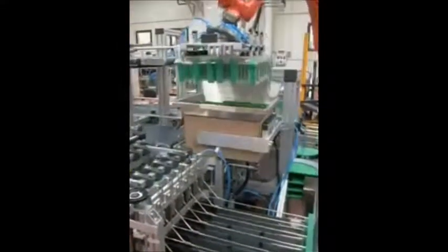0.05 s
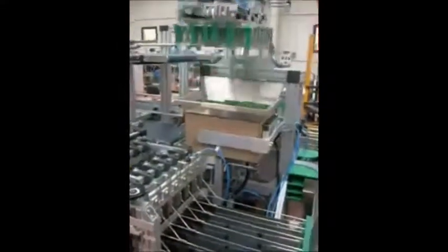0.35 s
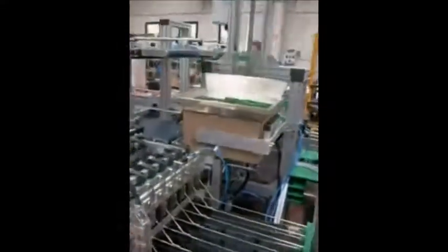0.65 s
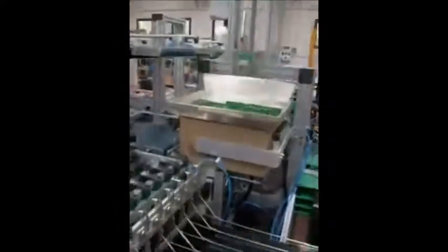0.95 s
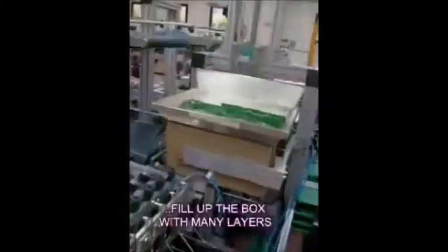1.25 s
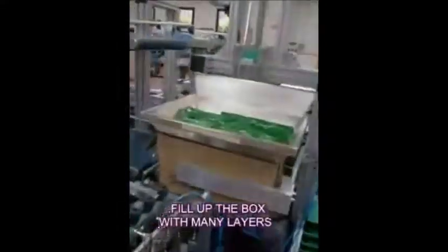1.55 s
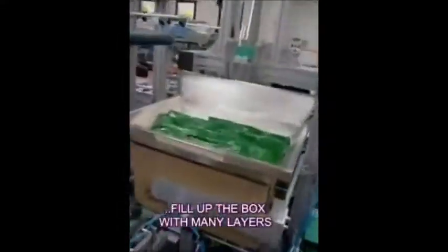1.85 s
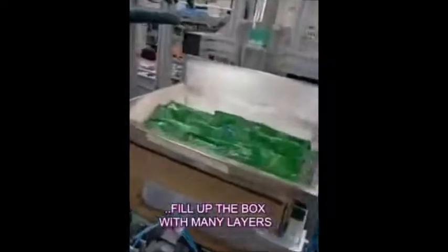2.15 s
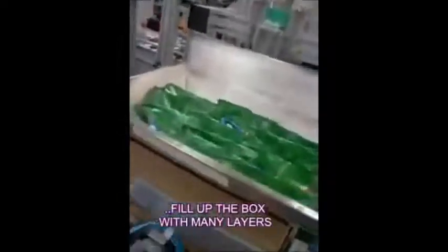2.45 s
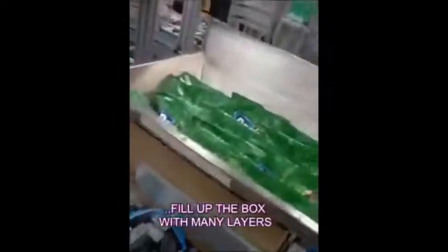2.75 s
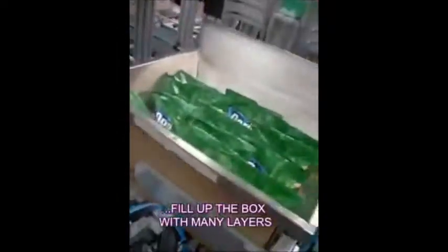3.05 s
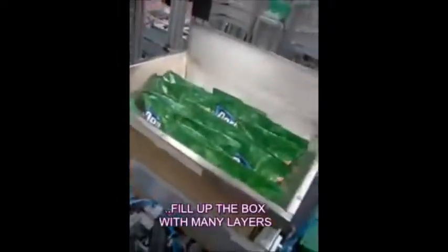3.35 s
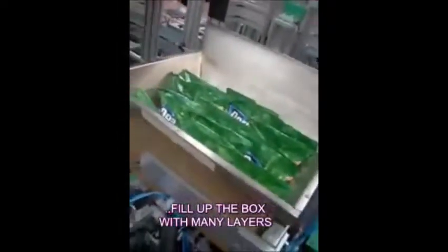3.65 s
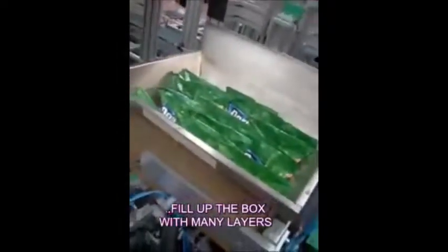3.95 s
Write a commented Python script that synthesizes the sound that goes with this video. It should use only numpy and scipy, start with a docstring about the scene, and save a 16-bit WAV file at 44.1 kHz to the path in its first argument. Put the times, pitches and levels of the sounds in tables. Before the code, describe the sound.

Compressed air hisses, swells to a loud hollow rush, then dies back over factory machinery.

```python
"""Factory hall: a packing robot lifts its air gripper off a box; valves and linkages click.
Compressed air spurts, settles to a steady hiss with high whistles, then swells to a loud,
hollow rush and dies back. The air rings between nearby panels, a flutter echo that sinks
as the gap widens. A motor whines thinly; machines rumble softly underneath."""
import sys
import numpy as np
from scipy import signal
from scipy.fft import rfft, irfft
from scipy.io import wavfile
from scipy.ndimage import uniform_filter1d, map_coordinates

SR = 44100
rng = np.random.default_rng(int(sys.argv[2]) if len(sys.argv) > 2 else 0)


def bounce(signal):
    """Save signal as a 16-bit WAV file at the path given by the first command-line argument."""
    frames = np.transpose(np.atleast_2d(signal))
    limited = np.clip(frames, -1, 1)
    pcm = np.round(limited * 32767).astype(np.int16)
    wavfile.write(sys.argv[1], SR, pcm)


N = 176400

# Round-trip rate between the panels: t/s, f/Hz
ECHO_RATE_HZ = [(2.25, 140.3), (2.45, 138.7), (2.55, 134.9), (2.65, 131.8), (2.75, 131.2), (3, 130.8),
                (3.06, 129.5), (3.15, 128.2), (3.24, 126.5), (3.4, 127)]


def amp(db):
    """dB to gain."""
    return 10 ** (np.asarray(db) / 20)


def unit(x):
    """Scale to rms 1."""
    return x / np.sqrt(np.mean(x ** 2) + 1e-20)


def spectrum_db(points, hz):
    """Interpolate a spectrum over log frequency."""
    f, db = np.transpose(points)
    return np.interp(np.log(hz + 1), np.log(f + 1), db)


def envelope(points):
    """Level curve to gain per sample."""
    return amp(np.interp(np.arange(N) / SR, *np.transpose(points)))


def add(mix, start_s, sound):
    """Mix in at start_s, trimmed at both ends of the mix."""
    start = round(start_s * SR)
    sound = sound[max(-start, 0):]
    part = mix[max(start, 0):][:len(sound)]
    part += sound[:len(part)]


def wander(low_hz, top_hz):
    """Band-limited random motion, rms 1."""
    hz = np.fft.rfftfreq(N, 1 / SR)
    white = rfft(rng.standard_normal(N))
    return unit(irfft(white * hz / (hz + low_hz) / (1 + (hz / top_hz) ** 4), N))


def turbulence(spectrum, eddy_db, ring_db, flutter_db, flutter_hz):
    """Coloured noise, rms 1: broad eddies, narrow lingering resonances, overall flutter."""
    hz = np.fft.rfftfreq(2048, 1 / SR)
    real, imag, eddies, rings = rng.standard_normal((4, len(hz), N // 512 + 5))
    eddies = unit(uniform_filter1d(uniform_filter1d(eddies, size=24, axis=0), size=5, axis=1))
    rings = unit(uniform_filter1d(uniform_filter1d(rings, size=2, axis=0), size=36, axis=1))
    gain = amp(spectrum_db(spectrum, hz)[:, None] + eddy_db * eddies + ring_db * rings)
    noise = signal.istft((real + 1j * imag) * gain, nperseg=2048, noverlap=1536)[1][:N]
    return unit(noise * amp(flutter_db * wander(5.6, flutter_hz)))


def tone(hz, width_hz, db, rise_s=0.047, fall_s=0.15):
    """Breathy tone along a pitch curve; amplitude and phase sway at random."""
    t = np.arange(len(hz)) / SR
    sway = (wander(0.4, width_hz / 2) + 1j * wander(0.87, width_hz / 2))[:len(t)]
    carrier = np.exp(2j * np.pi * np.cumsum(hz) / SR)
    wave = (sway / np.sqrt(abs(sway) + 1e-6) * carrier).real
    shape = np.minimum(t / rise_s, 1) * np.minimum(t[::-1] / fall_s, 1)
    return amp(db) * shape * unit(wave)


def steady_tones(rows):
    """Sum of breathy tones at constant pitch."""
    out = np.zeros(N)
    for start_s, length_s, hz, width_hz, db in rows:
        add(out, start_s, tone(np.full(int(length_s * SR), hz), width_hz, db))
    return out


def air_rush():
    """Loud turbulent flow: swells, dies back."""
    spectrum = [(120, -69), (200, -62), (449, -33), (517, -33.5), (639, -23.5), (723, -26.5), (803, -26.5),
                (1200, -24.5), (1270, -23), (1490, -17), (1710, -7), (2350, -13), (2800, -3.5), (3340, 2),
                (3920, -8), (4130, -14.5), (5190, -17.5), (5770, -22.5), (8650, -36), (11900, -49.5),
                (13400, -60)]  # f/Hz, relative level/dB
    swell = [(1.3, -80), (1.75, -46), (1.85, -32.5), (2.08, -26.5), (2.3, -19.5), (2.56, -13), (2.72, -14),
             (2.94, -13), (3.08, -13), (3.27, -13), (3.42, -22.5), (3.6, -38), (3.75, -36), (4, -53)]  # t/s, level/dB
    return envelope(swell) * turbulence(spectrum, eddy_db=0.1, ring_db=1.5, flutter_db=1, flutter_hz=35)


def air_hiss():
    """Steady escape of compressed air."""
    spectrum = [(150, -68), (250, -42.5), (337, -39.5), (400, -31.5), (495, -24), (803, -20), (981, -20),
                (1220, -12.5), (1590, -15), (2410, -10), (2670, -9), (3200, 1.5), (3450, -2.5), (3950, -11),
                (5740, -28.5), (6450, -36), (10300, -47.5), (12200, -57), (13400, -73)]  # f/Hz, relative level/dB
    flow = [(.45, -56.5), (.65, -36.5), (.82, -38), (.96, -28), (1.1, -28), (1.22, -25), (1.6, -25),
            (2, -25), (3.3, -19.5), (3.58, -21), (3.75, -24), (4, -24.5)]  # t/s, level/dB
    return envelope(flow) * turbulence(spectrum, eddy_db=0.83, ring_db=2, flutter_db=0.13, flutter_hz=40)


def air_spurt():
    """First burst of compressed air."""
    spectrum = [(240, -87), (400, -46), (470, -37), (529, -30.5), (764, -36), (1200, -30), (1870, -32),
                (2050, -14.5), (2630, -15.5), (3270, 2), (3520, -5.5), (6160, -42.5), (11300, -56),
                (13400, -75)]  # f/Hz, relative level/dB
    burst = [(0, -46.5), (.2, -53.5), (.28, -45.5), (.36, -76), (.46, -60), (.5, -45), (.53, -44.5),
             (.57, -37), (.69, -29.5), (.78, -24.5), (.792, -21.5), (.83, -22.5), (.89, -24.5), (1.05, -29),
             (1.5, -55.5), (2, -81)]  # t/s, level/dB
    return envelope(burst) * turbulence(spectrum, eddy_db=1, ring_db=3.3, flutter_db=-0.9, flutter_hz=60)


def flutter_echo(air, trips=6):
    """One repeat per round trip between the panels; rings like a pipe."""
    trip_gain = [(2.1, -28), (2.35, -10), (2.6, -8), (2.8, -9), (3.25, -10.5), (3.7, -19)]  # t/s, gain per trip/dB
    gain = envelope(trip_gain)
    n = np.arange(N)
    trip_samples = SR / np.interp(n / SR, *np.transpose(ECHO_RATE_HZ))
    echoes = sum(gain ** k * map_coordinates(air, [n - k * trip_samples], order=3)
                 for k in range(1, trips + 1))
    return (air + echoes) * np.sqrt(1 - gain ** 2)


def hollow_tones():
    """Resonances on multiples of the echo rate, sinking with it."""
    resonances = [ (2.23, 0.27, 12, -36), (2.36, 0.18, 20, -30), (2.631, .28, 22, -23.5),
                  (2.7, 0.26, 29, -34), (2.7, 0.23, 24, -31), (2.73, 0.25, 14, -32), (2.76, 0.19, 27, -21),
                  (2.802, .2, 26, -29), (2.798, 0.18, 25, -24), (2.885, 0.31, 21, -24.5),
                  (2.877, 0.38, 15, -29.5), (2.901, 0.29, 12, -40), (2.94, 0.16, 26, -22),
                  (2.94, 0.19, 13, -20), (2.95, .19, 22, -17.5), (3.05, 0.3, 10, -32),
                  (3.142, 0.32, 15, -30.5), (3.192, 0.17, 5, -43), (3.198, 0.31, 13, -35.5)]  # t/s, length/s, multiple, level/dB
    out = np.zeros(N)
    for start_s, length_s, multiple, db in resonances:
        t = start_s + np.arange(int(length_s * SR)) / SR
        rate_hz = np.interp(t, *np.transpose(ECHO_RATE_HZ))
        add(out, start_s, tone(multiple * rate_hz, width_hz=5.9, db=db, fall_s=0.086))
    return out


def whistles_and_whine():
    """High air whistles and a thin, steady motor whine."""
    high_tones = [ (0, 0.71, 8000, 20, -84), (.46, 0.42, 8100, 27, -76), (0.465, 0.098, 6000, 400, -56),
                  (1.46, 0.21, 7200, 200, -57), (1.46, 0.22, 7700, 450, -57), (1.777, 1, 6240, 500, -49),
                  (1.767, 0.79, 9600, 800, -62), (1.775, 0.82, 7620, 1100, -54),
                  (1.794, 0.77, 4576, 1200, -36), (1.926, 0.16, 8400, 300, -48.5),
                  (2.099, 1.4, 5105, 11, -41)]  # t/s, length/s, f/Hz, width/Hz, level/dB
    return steady_tones(high_tones)


def clicks(ring_hz=3255, rise_s=0.0005):
    """Valve and linkage impacts: noise burst plus brief ring."""
    impacts = [(.024, -34.5, 0.0063, -12, -0.5), (.183, -30.5, 0.0026, 2, 0.5),
               (0.2554, -30, 0.0016, -11, 1.5), (3.483, -36, 0.0025, -14, 16), (3.667, -34, .003, -12, 8),
               (3.746, -33, .008, -12, 6), (3.893, -28, 0.0055, -12, 2.5), (3.93, -26, .002, -12, 3)]  # t/s, level/dB, decay/s, relative ring/dB, tilt/(dB/octave)
    spectrum = [(300, -9), (1000, -2), (2400, -6), (3250, 13.5), (3800, -13.5), (4500, -9), (6500, -20.5),
                (9500, -23), (13000, -47)]  # f/Hz, relative level/dB
    out = np.zeros(N)
    t = np.arange(2048) / SR
    hz = np.fft.rfftfreq(len(t), 1 / SR)
    octaves = np.log2(hz / ring_hz + 1e-3)
    ring = np.sin(2 * np.pi * ring_hz * t)
    for start_s, db, decay_s, ring_db, tilt in impacts:
        colour = amp(spectrum_db(spectrum, hz) + tilt * octaves)
        noise = unit(irfft(rfft(rng.standard_normal(len(t))) * colour))
        shape = np.minimum(t / rise_s, 1) * np.exp(-t / decay_s)
        add(out, start_s, amp(db) * shape * (amp(ring_db) * ring + noise))
    return out


def machine_hums():
    """Faint hums of running machines."""
    hums = [(-.05, .4, 301, 31, -62.5), (-.05, 0.24, 535, 18, -53.5), (0.082, 1, 643, 29, -65),
            (2.15, 0.89, 523, 22, -55)]  # t/s, length/s, f/Hz, width/Hz, level/dB
    return steady_tones(hums)


def hall():
    """Distant air lines, deep building drone, machine rumble."""
    line_spectrum = [(90, -18), (170, -16.5), (280, -8.5), (370, -10.5), (480, -6), (650, -6.5), (800, -9),
                     (1300, -5.5), (2000, -6.5), (2700, -4.5), (3250, 3), (3700, -9.5), (4300, -24),
                     (6500, -25), (10000, -35), (13400, -51)]  # f/Hz, relative level/dB
    drone_spectrum = [(10, 4), (24, -0.5), (40, -12), (80, -12), (140, -13.5), (220, -24), (500, -46)]  # f/Hz, relative level/dB
    rumble_spectrum = [(22, -15), (45, -16), (80, -13.5), (130, -11), (300, 0), (520, -3.5), (800, -8),
                       (1100, -1), (1600, -15), (3000, -35), (7000, -63)]  # f/Hz, relative level/dB
    rumble_level = [(0, -52), (.08, -52), (.2, -56), (.35, -70.5), (1.9, -68.5), (2.55, -52), (3.4, -51.5),
                    (3.58, -46.5), (3.7, -51), (4, -53.5)]  # t/s, level/dB
    air_lines = turbulence(line_spectrum, eddy_db=0.5, ring_db=2, flutter_db=1.6, flutter_hz=20)
    drone = turbulence(drone_spectrum, eddy_db=3.5, ring_db=0, flutter_db=0, flutter_hz=30)
    rumble = turbulence(rumble_spectrum, eddy_db=0, ring_db=2.5, flutter_db=3.4, flutter_hz=25)
    return amp(-50.5) * air_lines + amp(-76.5) * drone + envelope(rumble_level) * rumble


def scene():
    """Mono mix; only hiss and rush feed the echo."""
    background = hall()
    air = air_spurt() + flutter_echo(air_hiss() + air_rush())
    return (background + air + whistles_and_whine() + machine_hums() + hollow_tones() + clicks())[None]


def record(dry):
    """Brief dips of bass and treble, soft peak limit, low-pass."""
    dips = [(.281, 8), (.772, 10), (2.011, 10), (2.733, 18)]  # t/s, depth/dB
    dip_s, bass_hz, treble_hz = 0.0084, 1000, 4870
    ceiling, cutoff_hz = 0.94, 13300
    t, hz = np.arange(N) / SR, np.fft.rfftfreq(N, 1 / SR)
    low, high = (hz / bass_hz) ** 4, (hz / treble_hz) ** 10
    midband = irfft(rfft(dry) * low / (1 + low) / (1 + high), N)
    dip_db = sum(db * np.exp(-((t - centre_s) / dip_s) ** 2) for centre_s, db in dips)
    dipped = midband + (dry - midband) * amp(-dip_db)
    limited = dipped / (1 + abs(dipped / ceiling) ** 20) ** (1 / 20)
    lowpass = signal.firwin(201, cutoff_hz, window=("kaiser", 8), fs=SR)
    return signal.oaconvolve(limited, lowpass[None], "same")


dry = scene()
out = record(dry)
bounce(out)
```